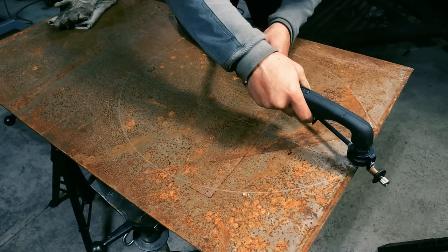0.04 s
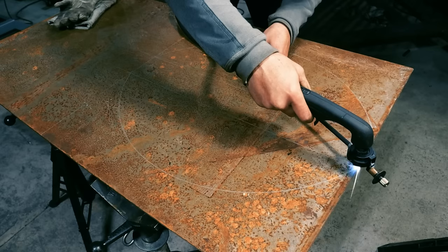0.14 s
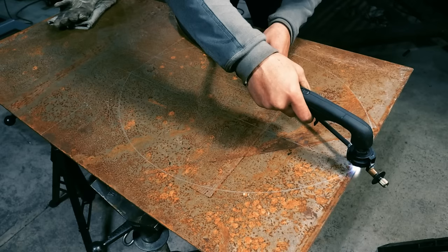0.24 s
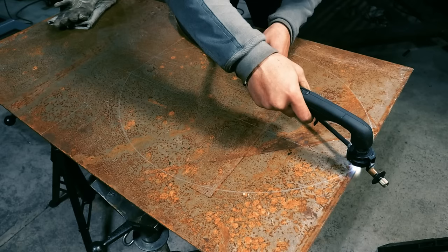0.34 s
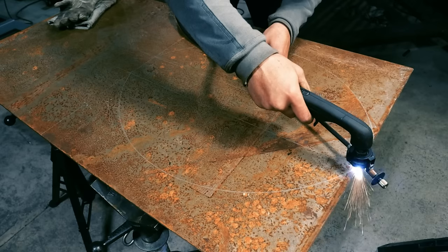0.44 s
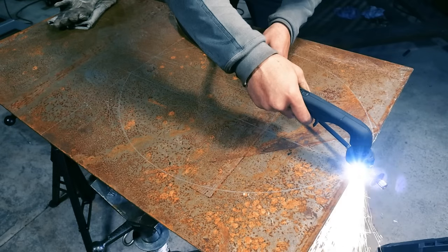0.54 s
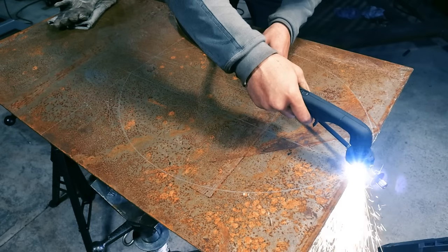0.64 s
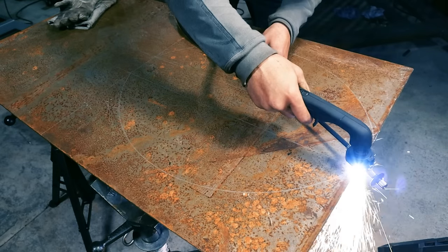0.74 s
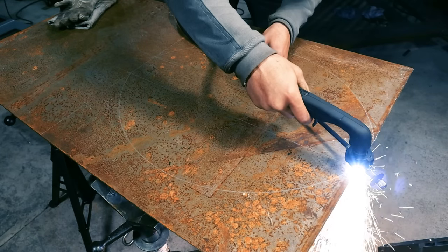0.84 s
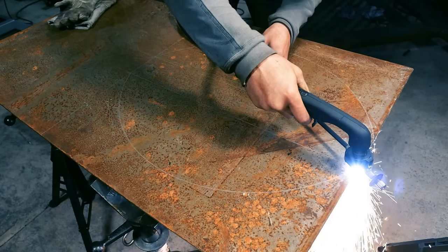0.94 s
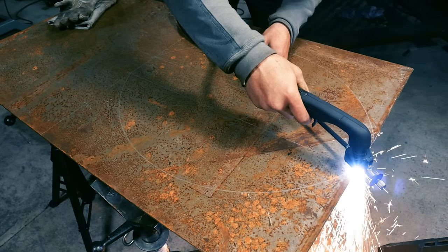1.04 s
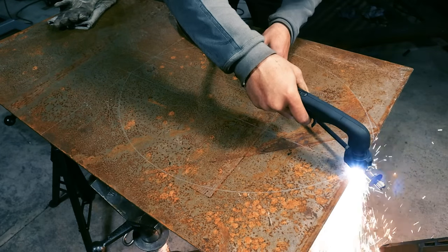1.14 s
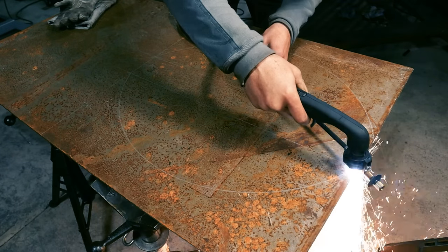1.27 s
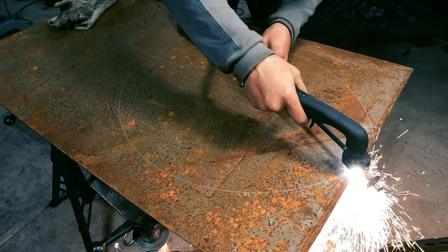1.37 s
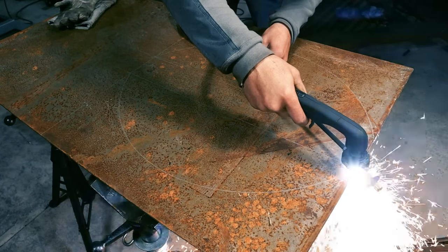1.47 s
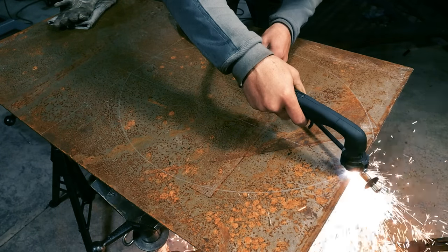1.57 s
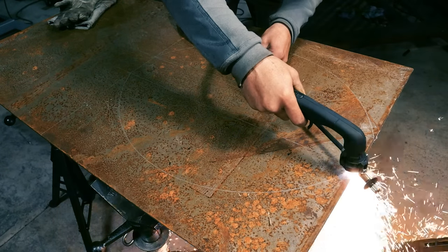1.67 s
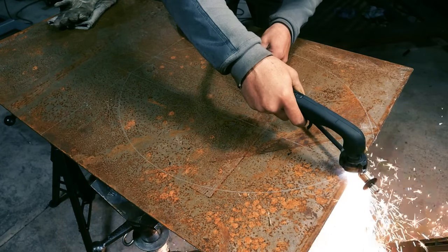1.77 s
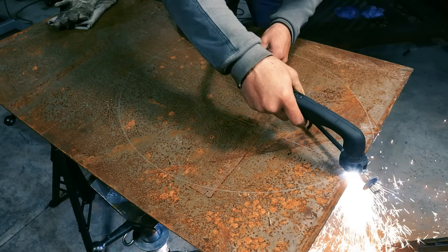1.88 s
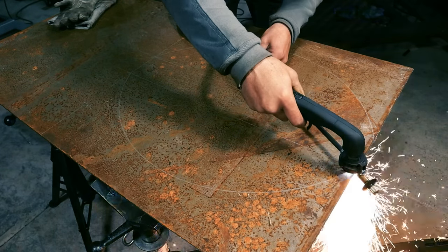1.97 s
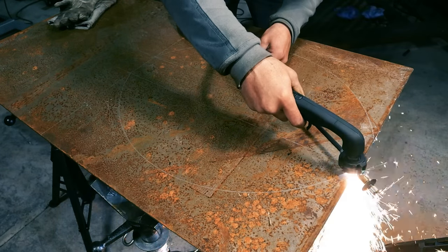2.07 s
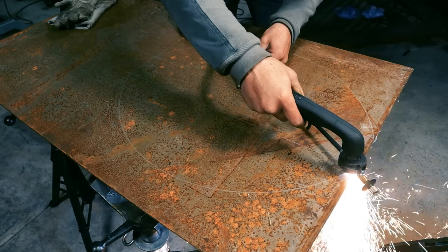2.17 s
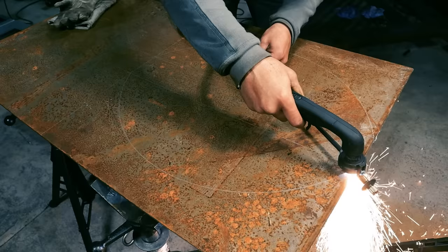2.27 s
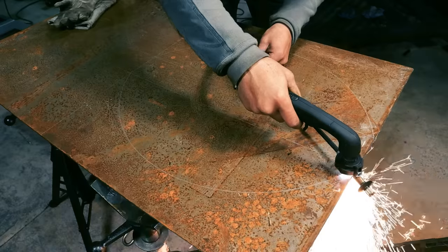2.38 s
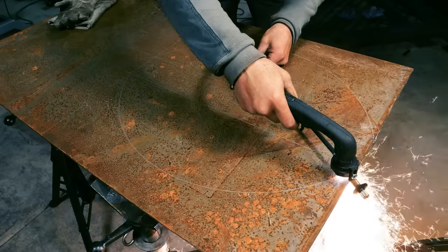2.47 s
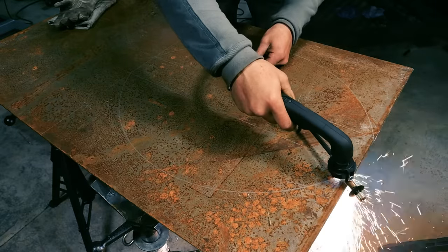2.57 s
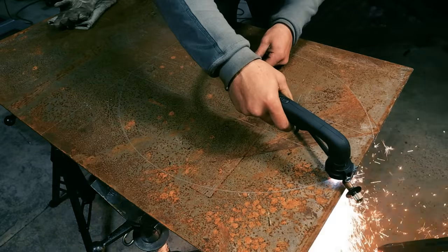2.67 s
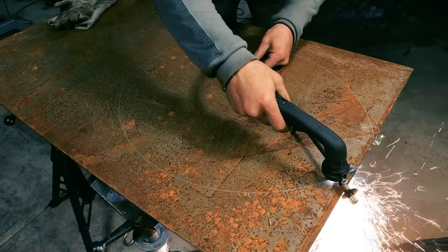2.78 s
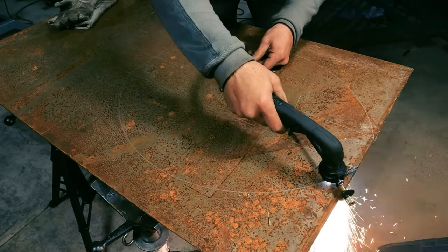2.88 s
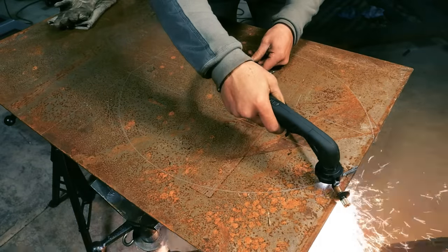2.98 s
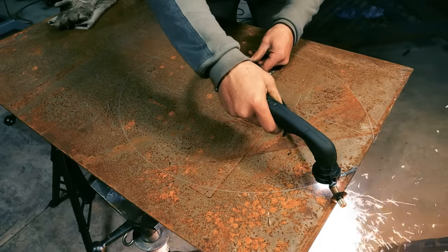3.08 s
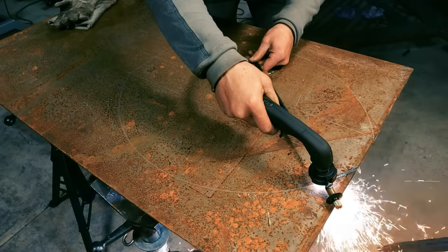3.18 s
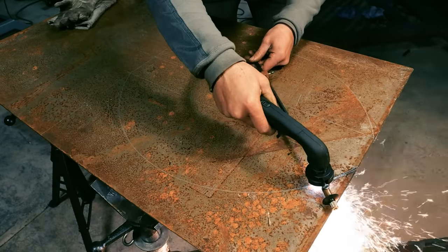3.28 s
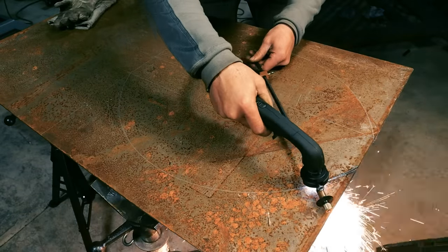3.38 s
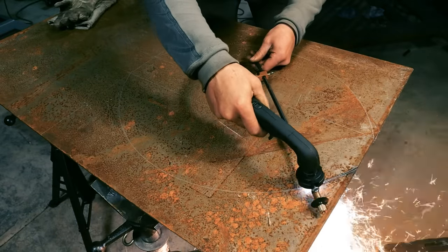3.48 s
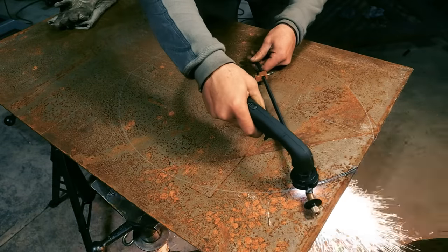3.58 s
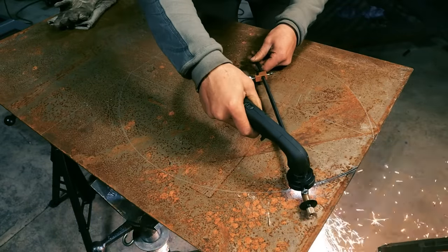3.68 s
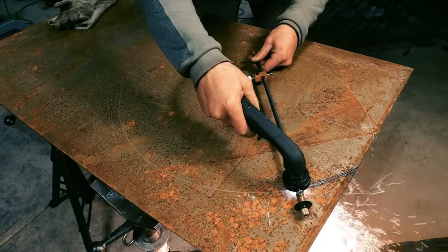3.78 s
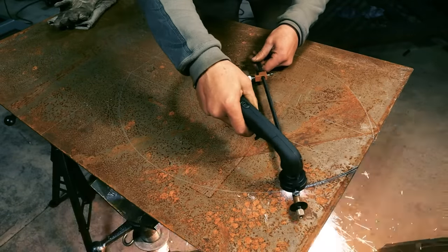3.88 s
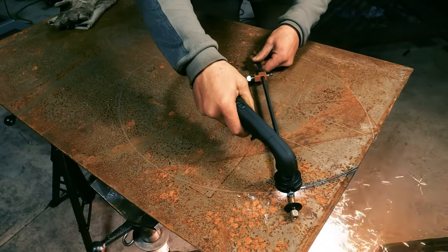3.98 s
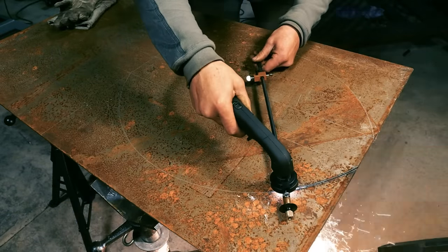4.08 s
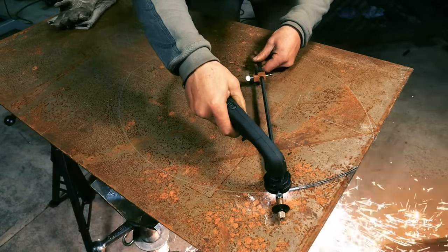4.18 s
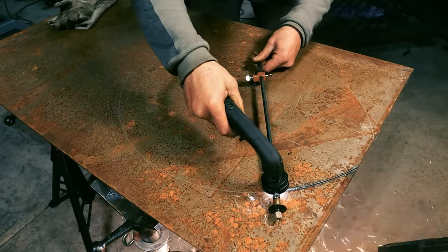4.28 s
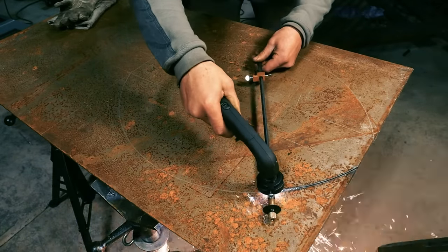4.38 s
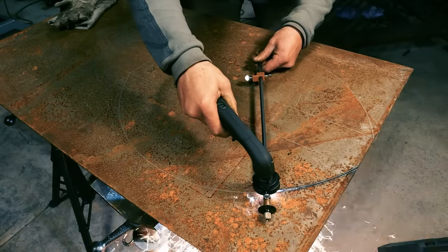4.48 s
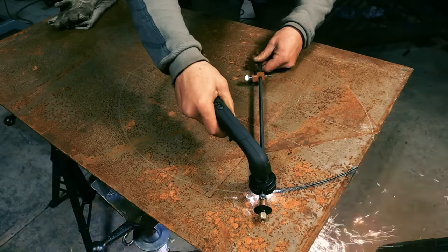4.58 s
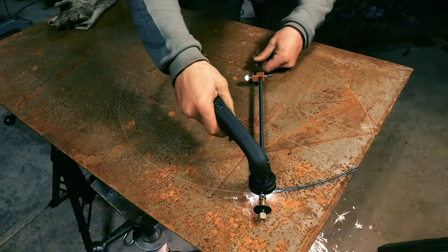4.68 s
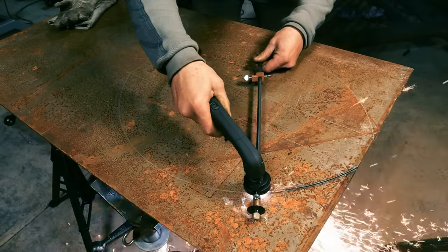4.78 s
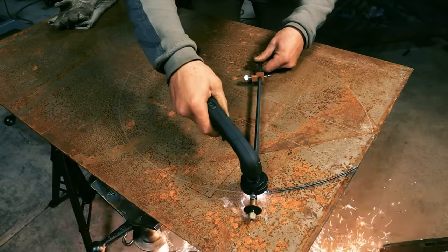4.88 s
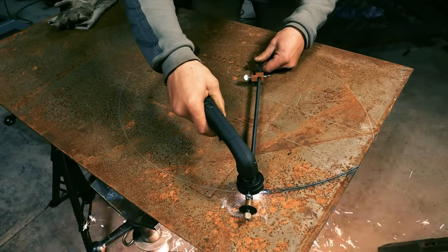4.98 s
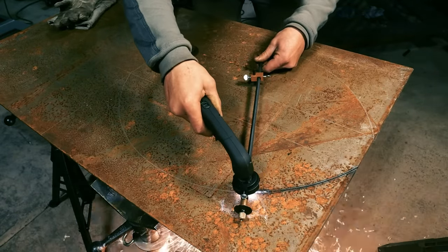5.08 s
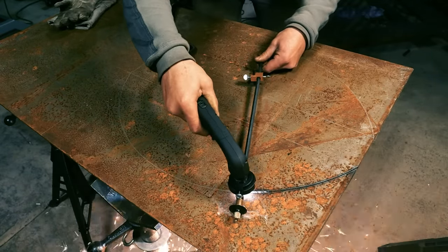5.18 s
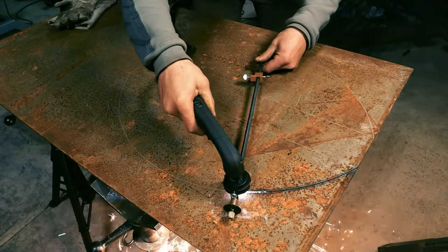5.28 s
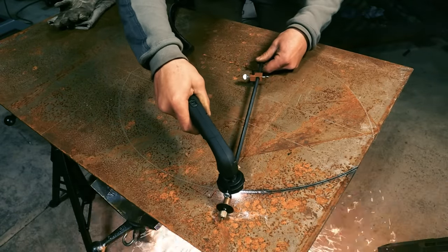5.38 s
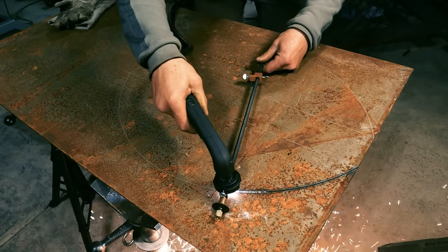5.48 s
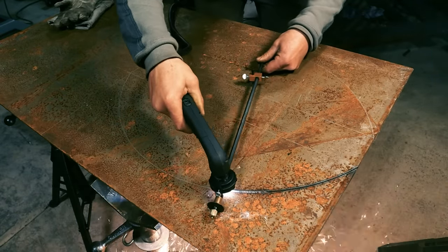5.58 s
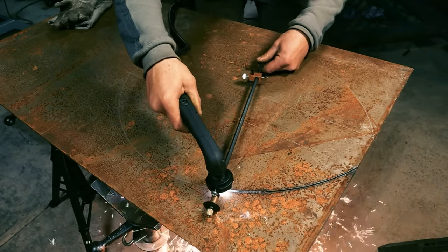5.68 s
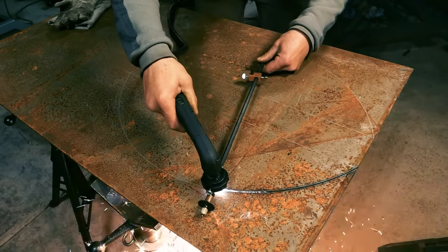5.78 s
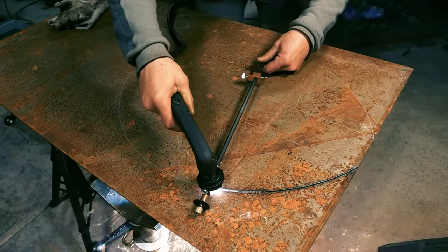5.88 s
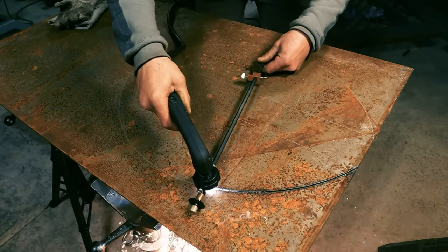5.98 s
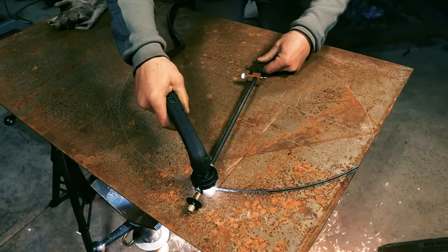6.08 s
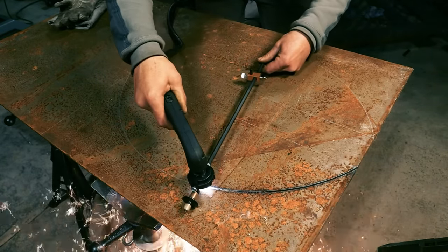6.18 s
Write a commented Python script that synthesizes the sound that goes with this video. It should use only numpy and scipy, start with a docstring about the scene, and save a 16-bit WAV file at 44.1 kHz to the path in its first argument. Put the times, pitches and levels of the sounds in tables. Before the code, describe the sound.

A quick click, a rush of air and a pop open a plasma cut in steel plate. The jet blows loud and full, fizzing with tiny snaps of molten metal and growing a little shriller. Then the roar suddenly falls away as the torch moves into the plate, leaving a softer, high, unsteady hiss that falters now and then but carries on. The workshop adds only slight, short echoes.

```python
"""Plasma torch cutting steel

In a workshop, a hand torch's air valve clicks, air rushes out and the arc lights with a pop.
The turbulent jet roars at the plate's edge, then drops abruptly to a thin, fluttering hiss as it
blows down through the kerf and the plate screens it. Bursting droplets of melt add fine spatter."""
import sys
import numpy as np
from scipy import signal
from scipy.fft import rfft, irfft
from scipy.io import wavfile

SR = 44100
rng = np.random.default_rng(int(sys.argv[2]) if len(sys.argv) > 2 else 0)


def unload_wav(signal):
    """Save mono or channel-first audio to the path in sys.argv[1] as 16-bit WAV at rate SR, clipped to [-1, 1]."""
    wavfile.write(
        sys.argv[1],
        SR,
        np.round(np.clip(np.atleast_2d(signal).T, -1, 1) * 32767).astype(np.int16),
    )


N = 275184
TIME, HZ = np.arange(N) / SR, np.fft.rfftfreq(N, 1 / SR)

# cue times, from the valve opening to the jet entering the kerf
VALVE_S, CLICK_S, RUSH_S, ARC_S, POP_S = .176, .184, .233, .266, .2685
PIERCE_S, KERF_S = .576, 2.3785


# tone of the open jet: f/Hz, level/dB
EDGE_TONE = [(25, -47), (70, -27), (150, -28), (400, -18.5), (800, -7.5), (1400, -3.5), (3000, -2.5),
             (5000, 0), (7500, -0.6), (10000, -2.5), (13000, -1.5), (14500, -1.5), (15700, -10)]
# resonances of torch and plate: f/Hz, width/Hz, lift/dB
EDGE_RESONANCES = [(170, 36, 5.5), (254, 180, 8.5), (465, 84, 8.5), (673, 34, 6), (750, 22, 4),
                   (858, 235, 7), (1736, 13, 5), (2310, 400, 4), (2887, 540, 5), (3500, 850, 7.5),
                   (4400, 70, 2.5), (4950, 800, 5.5), (5740, 130, 3), (6370, 670, 2), (8790, 860, 3),
                   (9480, 710, 5), (10780, 900, 5.5)]
# roar, hiss and fizz faders: base level/dB, fade/(dB/s), share of the swell, flutter/dB
EDGE_MIX = [(-35, 0.4, 1.2, 0.63), (-24, 1.0, 1.0, .5), (-26, 1.9, 0.4, 0.15)]
# swell as the torch feeds into the edge: t/s, level/dB
FEED_SWELL = [(.38, -0.5), (.45, 0.5), (.54, -1), (.68, 1.4), (.95, -0.5), (1.15, 0), (1.48, -3.5),
              (1.54, .5), (1.63, 1.1), (1.69, -2), (1.89, 0.1), (2.01, 2), (2.1, -0.1), (2.36, 1)]

def edge_jet():
    """The jet blows past the plate's edge with nothing to screen it: loud and full."""
    air = turbulence(spatter_per_s=1200, spatter_db=-14.5, spread_db=6.5)
    air = shape(air, colour(EDGE_TONE, EDGE_RESONANCES))
    air = early_echoes(air, echo_db=-10.5, decay_s=.023, stay_s=2.0)
    pierce_db = 1.7 * (TIME < PIERCE_S)  # extra fizz until the arc has burnt through
    jet = jet_bands(air, EDGE_MIX, ARC_S, swell_db=curve(FEED_SWELL), fizz_db=pierce_db)
    flare_db = 4.5 * np.exp(-since(ARC_S) / .053)  # the fresh arc flares, then settles
    jet = jet * amp(flare_db)
    shrill_db = 4.8 * np.minimum(since(.99) / .53, 1)  # the nozzle turns shrill
    top_end = shape(jet, 1 / (1 + (13200 / (HZ + 1)) ** 20))
    jet = jet + (amp(shrill_db) - 1) * top_end
    return jet * gate(ARC_S, KERF_S, rise_s=.007, fall_s=.001)


# thin tone of the screened jet: f/Hz, level/dB
KERF_TONE = [(25, -49), (100, -42), (200, -39.5), (400, -28.5), (900, -25), (1600, -21), (2500, -23),
             (3800, -18.5), (5000, -5.5), (7500, -4.5), (11000, -2), (13500, -0.5), (15000, 1.5)]
# resonances of the space under the plate: f/Hz, width/Hz, lift/dB
UNDERSIDE_RESONANCES = [(606, 57, 2), (1120, 220, 3.5), (1446, 66, 8), (1526, 32, 4.5), (1794, 380, 7.5),
                        (2062, 69, 6), (2365, 380, 7.5), (2695, 30, 4.5), (2816, 116, 9.5), (3030, 110, 10),
                        (3250, 160, 9), (3580, 630, 8), (4344, 200, 8), (4900, 64, 5.5), (6470, 400, 2)]
# roar, hiss and fizz faders: base level/dB, fade/(dB/s), share of the swell, flutter/dB
KERF_MIX = [(-58, 0.76, 0.75, 1.24), (-43, 0.73, .8, 1.0), (-34.5, 0.8, 0.31, 0.6)]
# the slot's breathy whistle sinks as the torch moves inward, then lifts a little: t/s, f/Hz
WHISTLE_PITCH = [(3.6, 5800), (4.2, 5150), (5.3, 5060), (6.2, 5450)]
# a brief falling chirp in the hiss: t/s, f/Hz
CHIRP_PITCH = [(3.76, 3250), (3.8, 2900), (3.86, 2700)]
# the hiss falters or surges: centre t/s, length/s, level/dB
HISS_SPUTTERS = [(2.778, 0.073, -3.5), (2.848, 0.039, 3.5), (3.28, 0.11, -3.5), (3.45, .06, -4),
                 (3.63, 0.35, 0.5), (4.252, 0.061, -6), (4.51, 0.066, -1.5), (4.69, 0.18, -4.5),
                 (5.061, 0.022, 3), (5.413, 0.036, -6), (5.905, 0.035, -3), (6.153, .14, 2)]

def kerf_jet():
    """Inside the cut the plate screens the roar; the hiss flutters as the melt comes and goes."""
    air = turbulence(spatter_per_s=1000, spatter_db=-10, spread_db=1.0)
    air = shape(air, colour(KERF_TONE, UNDERSIDE_RESONANCES))
    wobble = 1 + .025 * wander(15)  # melt keeps reshaping the slot
    whistle = resonate(air, curve(WHISTLE_PITCH) * wobble, width_hz=520)
    chirp = resonate(air, curve(CHIRP_PITCH), width_hz=120)
    chirp *= gate(CHIRP_PITCH[0][0], CHIRP_PITCH[-1][0], rise_s=.02, fall_s=.02)
    air = air + amp(-11.5) * whistle + amp(4) * chirp
    air = early_echoes(air, echo_db=-4.5, decay_s=.022, stay_s=.607)
    swell_db = sum(db * np.exp(-(2 * (TIME - s) / length) ** 2) for s, length, db in HISS_SPUTTERS)
    fizz_db = 2 * np.exp(-since(KERF_S) / .27)  # settles as the jet sinks in
    return jet_bands(air, KERF_MIX, KERF_S, swell_db, fizz_db) * (TIME > KERF_S)


# envelopes of the first air through the nozzle: t/s, level/dB
LEAK_LEVEL = [(.176, -54), (.232, -54)]
RUSH_LEVEL = [(.233, -30), (.241, -33), (.25, -25.5), (.258, -30), (.266, -18.5)]
# tones of the soft leak, full rush, bright click and sharp pop: f/Hz, level/dB
LEAK_TONE = [(30, 1), (90, -6.5), (200, -8), (350, -0.5), (800, -6.5), (1500, -13.5), (3000, -11.5),
             (5200, -9), (7000, -28), (15000, -24.5)]
RUSH_TONE = [(30, -12.5), (90, -7.5), (200, -3.5), (700, 1), (1300, -9), (2400, -4), (4000, -2.5),
             (6000, -23), (15000, -18)]
CLICK_TONE = [(100, -25), (1500, -22.5), (2600, -9), (4000, -7.5), (5000, 2), (5700, -16), (8000, -24),
              (15000, -27)]
POP_TONE = [(25, -0.5), (70, 3), (200, -13), (350, 2), (600, 2.5), (1400, 2.5), (3000, 11.5), (5000, -4),
            (9000, 3.5), (15000, -22)]

def ignition():
    """The valve clicks, air leaks and then rushes, and the arc lights with a pop."""
    leak = noise(LEAK_TONE) * amp(curve(LEAK_LEVEL)) * gate(VALVE_S, RUSH_S, rise_s=.00199, fall_s=.004)
    rush = noise(RUSH_TONE) * amp(curve(RUSH_LEVEL)) * gate(RUSH_S, POP_S, rise_s=.0018, fall_s=.002)
    click = burst(CLICK_S, CLICK_TONE, db=-23, rise_s=.0005, decay_s=.0009, tail_db=-17, tail_s=.0059)
    pop = burst(POP_S, POP_TONE, db=-16.5, rise_s=.0025, decay_s=.005, tail_db=-13.5, tail_s=.011)
    return leak + rush + click + pop


# tones of the dull spit and the bright spark: f/Hz, level/dB
SPIT_TONE = [(25, -12), (80, -4), (200, 4), (450, -2), (1000, 3), (2000, -15), (8000, -28)]
SPARK_TONE = [(60, -36), (400, -18), (1400, -11), (4200, 9), (6000, -10), (15000, -18)]

def melt():
    """A plug of melt blows out with a dull puff; later a single spark cracks."""
    spit = burst(PIERCE_S, SPIT_TONE, db=-32.5, rise_s=.002, decay_s=.0033, tail_db=-29, tail_s=.03)
    spark = burst(4.863, SPARK_TONE, db=-38.5, rise_s=.001, decay_s=.0025, tail_db=-24, tail_s=.008)
    return spit + spark


def turbulence(spatter_per_s, spatter_db, spread_db):
    """Jet noise with the tiny snaps of bursting droplets."""
    sizes = amp(spread_db * np.minimum(rng.exponential(1, N), 4)) * rng.choice([-1, 1], N)
    snaps = sizes * (rng.random(N) < spatter_per_s / SR)
    return rng.standard_normal(N) + amp(spatter_db) * unit(snaps)


def jet_bands(air, mix, start_s, swell_db, fizz_db):
    """Roar, hiss and fizz fade slowly; one unsteady flow swells and shakes them all."""
    lows, lows_and_mids = (1 / (1 + (HZ / crossover_hz) ** 10) for crossover_hz in (2400, 6500))
    bands = (lows, lows_and_mids - lows, 1 - lows_and_mids)
    flow, jet = wander(12), 0
    for band, (db, fade, share, flutter_db), extra_db in zip(bands, mix, (0, 0, fizz_db)):
        flutter = .95 * flow + .5 * wander(35)
        level_db = db - fade * since(start_s) + share * swell_db + flutter_db * flutter + extra_db
        jet = jet + unit(shape(air, band)) * amp(level_db)
    return jet


def early_echoes(x, echo_db, decay_s, stay_s, taps=2200, positions=4):
    """Echoes off plate, stand and floor ripple the tone; the pattern shifts as the torch moves."""
    wet = 0
    for k in range(positions):
        echoes = rng.standard_normal(taps) * np.exp(-np.arange(taps) / SR / decay_s)
        away = np.abs((TIME / stay_s - k + positions / 2) % positions - positions / 2)
        crossfade = np.cos(np.pi / 2 * np.minimum(away, 1))
        wet = wet + crossfade * signal.fftconvolve(x, echoes / np.linalg.norm(echoes))[:N]
    band_pass = HZ / np.hypot(HZ, 1200) / (1 + (HZ / 11000) ** 4)
    return x + amp(echo_db) * shape(wet, band_pass)


def burst(at_s, tone, db, rise_s, decay_s, tail_db, tail_s):
    """A noise hit that swells and dies in milliseconds, with a short tail."""
    attack = np.exp(-np.maximum(at_s - TIME, 0) / rise_s)
    release = np.exp(-since(at_s) / decay_s) + amp(tail_db) * np.exp(-since(at_s) / tail_s)
    return amp(db) * attack * release * noise(tone)


def resonate(x, hz, width_hz):
    """A resonance of gain 1 that sweeps along the curve hz."""
    turn = np.exp(2j * np.pi * np.cumsum(hz) / SR)
    pole = np.exp(-np.pi * width_hz / SR)
    return 2 * (turn * signal.lfilter([1 - pole], [1, -pole], x / turn)).real


def noise(tone):
    """Coloured noise at rms 1."""
    return unit(shape(rng.standard_normal(N), colour(tone)))


def wander(rate_hz):
    """Random modulation at rms 1, up to about this rate."""
    return unit(shape(rng.standard_normal(N), HZ / (HZ + rate_hz / 4) / (1 + (HZ / rate_hz) ** 2)))


def colour(tone, peaks=()):
    """An EQ curve: a smooth slope with resonances on top."""
    f, db = np.transpose(tone)
    slope_db = np.interp(np.log(HZ + 1), np.log(f), db)
    peaks_db = sum(lift / (1 + (2 * (HZ - hz) / width) ** 2) for hz, width, lift in peaks)
    return amp(slope_db + peaks_db)


def shape(x, gain):
    """Filters by a gain over frequency."""
    return irfft(rfft(x) * gain, N)


def curve(rows):
    """Joins breakpoints in time with straight lines."""
    return np.interp(TIME, *np.transpose(rows))


def gate(start_s, end_s, rise_s, fall_s):
    """Opens and closes with straight ramps."""
    return np.clip((TIME - start_s) / rise_s + .5, 0, 1) * np.clip((end_s - TIME) / fall_s + .5, 0, 1)


def since(cue_s):
    """Seconds since a cue, zero before it."""
    return np.maximum(TIME - cue_s, 0)


def amp(db):
    """Decibels to gain."""
    return 10 ** (np.asarray(db) / 20)


def unit(x):
    """Scales to rms 1."""
    return x / np.sqrt(np.mean(x ** 2) + 1e-20)


def scene():
    """The whole cut, dead centre in both channels."""
    torch = ignition() + edge_jet() + kerf_jet() + melt()
    return np.array([torch, torch])


def record(dry):
    """A steep high cut trims the very top."""
    high_cut = signal.firwin(1023, 15780, window=("kaiser", 9), fs=SR)
    return signal.oaconvolve(dry, high_cut[None], "same")


dry = scene()
out = record(dry)
unload_wav(out)
```